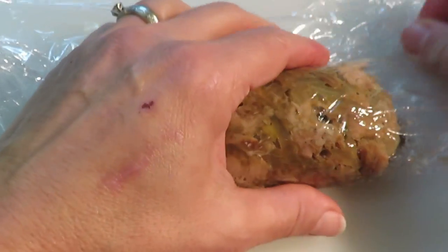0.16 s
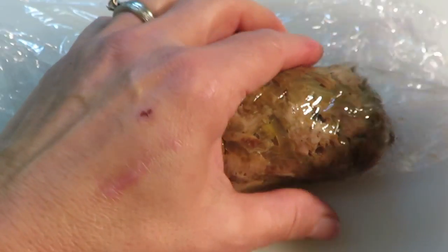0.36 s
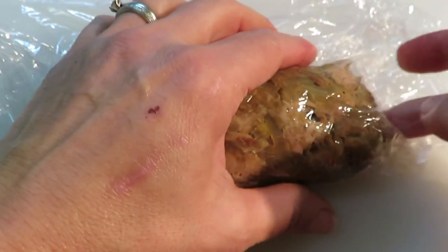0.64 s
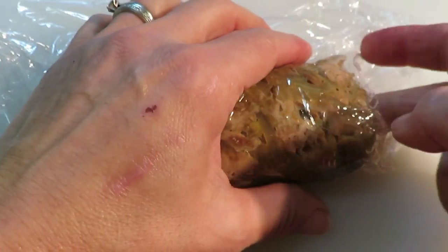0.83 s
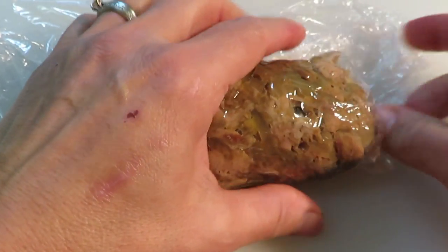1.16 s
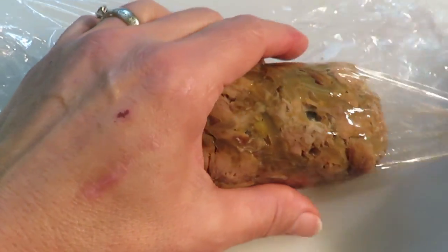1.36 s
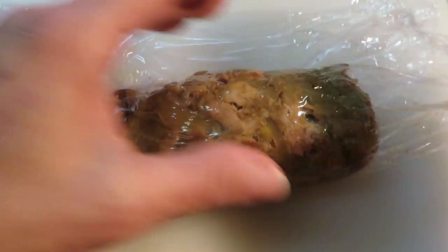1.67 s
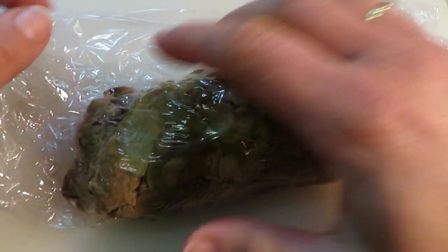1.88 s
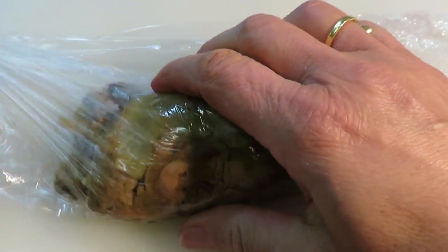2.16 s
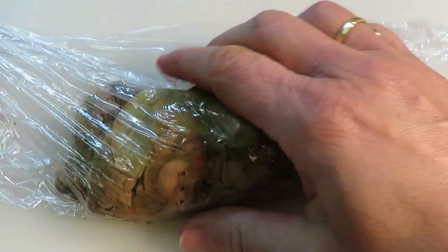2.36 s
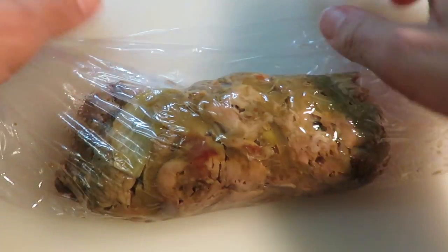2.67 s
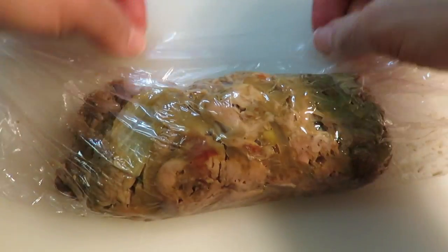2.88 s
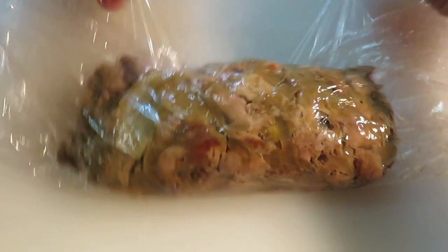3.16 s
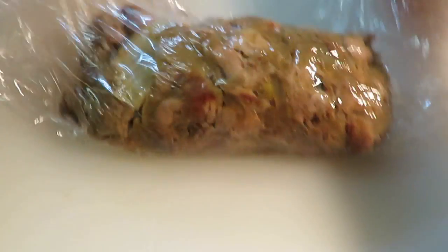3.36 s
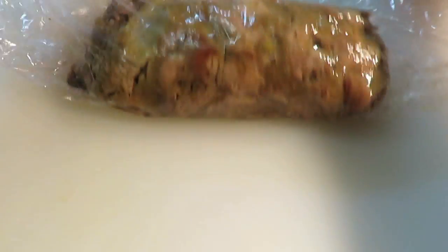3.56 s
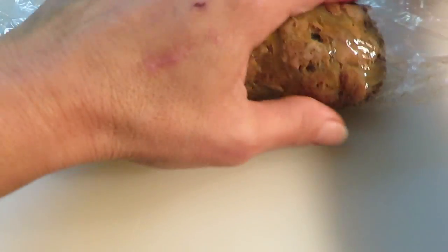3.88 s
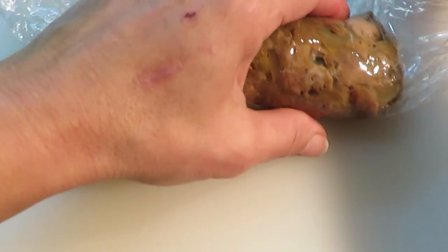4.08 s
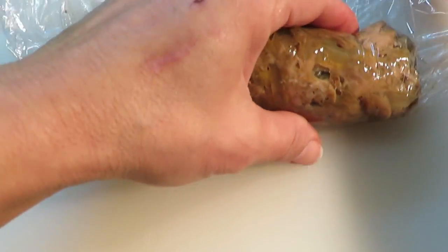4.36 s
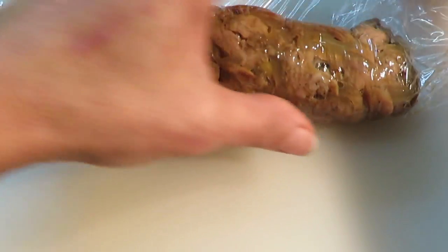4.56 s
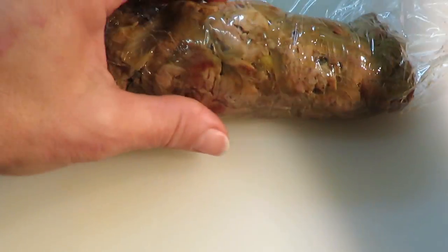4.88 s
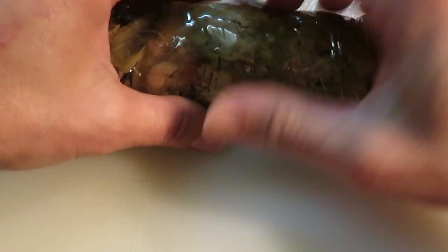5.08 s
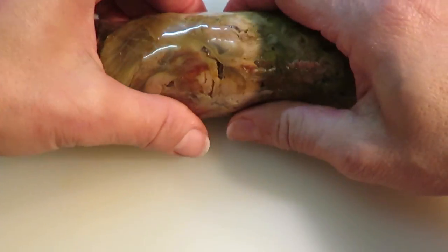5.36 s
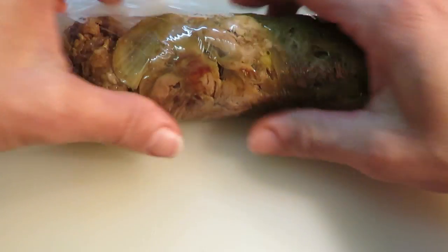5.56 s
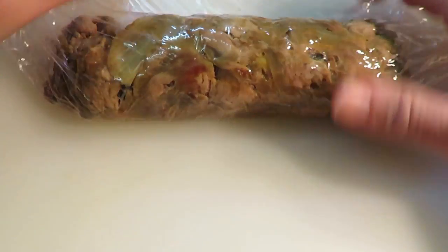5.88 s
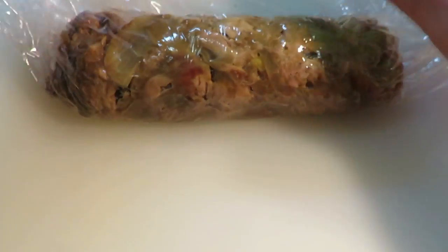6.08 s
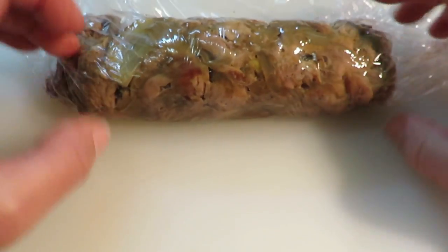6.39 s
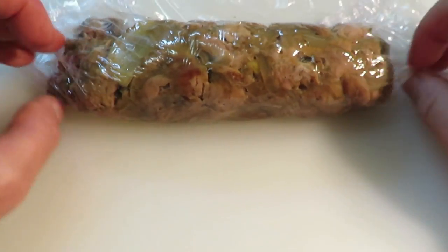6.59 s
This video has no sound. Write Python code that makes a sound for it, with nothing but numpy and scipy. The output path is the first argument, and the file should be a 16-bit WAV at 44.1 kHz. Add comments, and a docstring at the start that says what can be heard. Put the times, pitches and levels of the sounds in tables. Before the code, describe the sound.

Very close to the microphone, hands pull and twist thin plastic film around a firm roll of food. Bright crackling comes in short bursts with soft thuds on the board, then sharp snaps, densest just after two seconds. The board scrapes briefly, a hard thump follows, then quieter crinkling continues, ending with short scrapes. Small quiet kitchen, faint room noise.

```python
"""Hands roll and pull cling film around food on a plastic board in a quiet kitchen, heard close by. Throughout,
room noise lies under film crackle (swarms of ringing buckles) and the rumble of the board (noise-driven modes).
Early soft thuds (struck modes) come with two single snaps (large buckles) near 0.2 s; more snaps follow from
1.2 s, densest and loudest near 2.2 s. At 2.7 s the board scrapes the counter (stick-slip); a hard thud follows
at 3.3 s, then mostly quieter pulls from 4 s, and short scrapes again after 6.4 s."""
import sys
import numpy as np
from scipy import signal
from scipy.fft import rfft, irfft, next_fast_len
from scipy.io import wavfile
from scipy.ndimage import uniform_filter1d

SR = 44100
rng = np.random.default_rng(int(sys.argv[2]) if len(sys.argv) > 2 else 0)


def store_pcm(level_fs):
    """Save levels as 16-bit WAV."""
    pcm = np.round(np.clip(level_fs, -1, 1) * 32767).astype(np.int16)
    wavfile.write(sys.argv[1], SR, np.atleast_2d(pcm).T)


N = 296793
SPAN = next_fast_len(N)  # samples of a long transform


def amp(db):
    """Decibel definition: amplitude ratio of a level."""
    return 10 ** (np.asarray(db) / 20)


def evened(x):
    """Normalization to unit root-mean-square value."""
    return x / np.sqrt(np.mean(x ** 2) + 1e-20)


def smooth_noise(length):
    """Low-pass filtering by a moving average: slow noise of unit RMS."""
    return evened(uniform_filter1d(rng.standard_normal(N), length))


def read(points, hz):
    """Linear interpolation of a spectrum on a logarithmic frequency axis."""
    f, value = np.transpose(points)
    return np.interp(np.log(hz + 1), np.log(f + 1), value)


def kicks(s, size):
    """Impulse excitation: one sample of the given size at each time."""
    train = np.zeros(N)
    places = np.round(np.asarray(s) * SR).astype(int).clip(0, N - 1)
    np.add.at(train, places, size)
    return train


def ring(modes, damping=1):
    """Modal superposition: damped sines, neighbours in opposite phase; damping scales the bandwidths."""
    t = np.arange(8192) / SR
    total = 0
    for k, (hz, width_hz, db) in enumerate(modes):
        decay = np.exp(-np.pi * damping * width_hz * t)
        total = total + (-1) ** k * amp(db) * decay * np.sin(2 * np.pi * hz * t)
    return total


def rubbed(push, modes):
    """Forced vibration: a continuous push drives the modes, whose response has unit energy."""
    response = ring(modes)
    return signal.oaconvolve(push, response / np.linalg.norm(response))[:N]


def struck(s, db, modes, damping, soft):
    """Impact excitation: contact lasts soft samples, and each blow's ring peaks at db."""
    response = np.convolve(ring(modes, damping), np.hanning(round(soft) + 2))
    return signal.oaconvolve(kicks(s, amp(db)), response / abs(response).max())[:N]


def moves(rows, shape, rest_db=-120, rest_extra_db=0):
    """Power summation of overlapping movements: their level in dB and power-weighted extra column."""
    rise, fall, settle_db, settle_fall = shape
    s, length, db, growth_db, extra_db = np.transpose(rows)[:, :, None]
    t = np.arange(0, N + 64, 64) / SR
    after = np.maximum(t - s - length, 0)
    progress = np.clip((t - s) / np.maximum(length, .005), 0, 1)
    held_db = db - growth_db * (1 - progress) + rise * np.minimum(t - s, 0)
    stopping = amp(-2 * fall * after)
    settling = amp(2 * (settle_db - settle_fall * after))
    power = amp(2 * held_db) * (stopping + settling)
    rest = amp(2 * rest_db)
    total = power.sum(0) + rest
    extra = ((power * extra_db).sum(0) + rest * rest_extra_db) / total
    return [np.interp(np.arange(N) / SR, t, course) for course in (10 * np.log10(total), extra)]


# spectrum of the room noise, up to an overall gain: f/Hz, density level/dB per Hz
ROOM_SPECTRUM = [(12, -53), (20, -39), (124, -8), (218, -5.5), (361, -3.5), (492, -9.5), (690, -8.5),
                 (1280, -15), (1430, -12), (8890, -26.5), (16500, -50)]
ROOM_DB = -52.5  # RMS level over both ports
# likeness of the noise at the two ports: f/Hz, coherence/1
LIKENESS = [(60, 0.58), (300, 0), (1500, 0), (6000, 0), (15000, 0)]


def room_tone():
    """Stationary Gaussian noise: steady low room noise over microphone hiss, partly coherent at the ports."""
    hz = np.fft.rfftfreq(SPAN, 1 / SR)
    a, b = rfft(rng.standard_normal((2, SPAN)))
    same = np.clip(read(LIKENESS, hz), 0, 1)
    right = same * a + np.sqrt(1 - same ** 2) * b
    spectra = np.array([a, right]) * amp(read(ROOM_SPECTRUM, hz))
    return amp(ROOM_DB) * evened(irfft(spectra, SPAN)[:, :N])


def kitchen(x, t60, gap, low_hz):
    """Diffuse reverberation: a random tail after gap s, different at each port, thin below low_hz."""
    t = np.arange(round(t60 * SR)) / SR
    tail = rng.standard_normal((2, len(t))) * amp(-60 * t / t60) * (t > gap)
    tail = signal.lfilter(*signal.butter(2, low_hz, "high", fs=SR), tail)
    return signal.oaconvolve(x, tail / np.linalg.norm(tail[0]), axes=1)[:, :N]


def hands(x, count=3):
    """Time-varying scattering: as hands and food move, one close scatter pattern fades into the next."""
    turn = np.cumsum(9 + 4 * smooth_noise(4000)) / SR  # half turns
    fades = [np.sqrt(2 / count) * np.cos(np.pi * (turn + k / count)) for k in range(count)]
    return sum(kitchen(x * fade, .03, .0003, 1300) for fade in fades)


# modes of counter, board, rim and upper rim: f/Hz, bandwidth/Hz at unit damping, relative level/dB
COUNTER_MODES = [(62, 26.5, 2.5), (123.5, 67, 1), (199, 51, -5)]
BOARD_MODES = [(266.4, 71, 1), (351, 43, 2), (405.5, 83, 4.5)]
RIM_MODES = [(690, 40, -50), (705, 660, 5), (930, 205, 17), (1240, 190, 4)]
UPPER_RIM_MODES = [(1375, 68, -5), (1766, 133, -2.5), (2170, 140, -8), (3100, 1400, 3.5)]
# blows on the board: t/s, peak level/dB of counter, of board, of rim
BLOWS = [(.2, -38, -52, -33), (0.546, -44, -40, -38), (0.624, -36.5, -59, -33.5), (1.102, -42, -48, -31),
         (1.924, -36, -30.5, -43), (1.953, -41, -33, -44), (1.975, -38, -28, -40),
         (2.222, -48, -28.5, -28.5), (2.732, -33, -37, -47), (3.218, -33, -40, -55),
         (3.276, -17.5, -19.5, -15), (3.304, -48, -26.5, -24.5), (3.527, -30, -30.5, -25),
         (4.312, -41, -31, -33.5), (4.703, -58, -29.5, -30), (5.562, -41, -32, -59),
         (6.347, -44, -38.5, -35)]
# food and hands press on the board: start t/s, length/s, end level/dB, growth/dB, extra level/dB of
# the counter's deep modes
PRESS_MOVES = [(0, .04, -61, -22, -1), (1.36, .063, -41, 6.5, -3), (1.585, 0.057, -58.5, -5, 10.5),
               (1.919, 0.22, -45, -2, 2.5), (2.743, 0.13, -57.5, -6.5, 12.5),
               (2.978, 0.088, -49.5, -1, 2.5), (3.24, 0.14, -47.5, -7, -2), (3.453, 0.26, -47, -7, -3.5),
               (3.94, 0.15, -50.5, 3, -3), (4.3, 0.03, -54, -1, 2), (5.557, 0.46, -47, -1.5, -7),
               (6.053, 0.085, -56.5, -6, -2.5), (6.52, 0.19, -47.5, 2, -4)]
# envelope of a press: rise/(dB/s), fall/(dB/s), settling level/dB, settling fall/(dB/s)
PRESS_ENVELOPE = (296, 272, -29, 100.)
RESTING_DB, RESTING_DEEP_DB = -59.5, 2.5  # level between presses, and its extra for the deep modes


def board():
    """Forced and free vibration: lumpy rolling pressure and blows ring counter, board and rim."""
    lumpy = amp(1.8 * smooth_noise(700))
    shake, deep, middle, high = evened(rng.standard_normal((4, N)) * lumpy)
    level_db, deep_db = moves(PRESS_MOVES, PRESS_ENVELOPE, RESTING_DB, RESTING_DEEP_DB)
    roll = rubbed(deep * amp(level_db + deep_db), COUNTER_MODES[1:])
    roll = roll + rubbed(middle * amp(level_db), BOARD_MODES)
    roll = roll + rubbed(high * amp(level_db - 9), RIM_MODES)
    # the lowest mode never quite rests
    roll = roll + rubbed(shake * amp(0.34 * level_db - 38.0), COUNTER_MODES[:1])
    s, counter_db, board_db, rim_db = np.transpose(BLOWS)
    blows = struck(s, counter_db, COUNTER_MODES, 0.51, 40)
    blows = blows + struck(s, board_db, BOARD_MODES, 1.37, 32)
    return roll + blows + struck(s, rim_db, RIM_MODES + UPPER_RIM_MODES, 1.3, 13)


# board and food slide: start t/s, length/s, end level/dB, growth/dB, extra level/dB of the upper rim modes
SLIDE_MOVES = [(2.73, 0.14, -36, 1.5, -8.5), (3.49, .2, -50.5, -7.5, 2), (6.485, 0.036, -35, 13, -17),
               (6.53, 0.049, -26, 1.5, -12), (6.642, 0.069, -39, -11.5, -32)]
# envelope of a slide: rise/(dB/s), fall/(dB/s), settling level/dB, settling fall/(dB/s)
SLIDE_ENVELOPE = (4000., 700., -4., 260.)
# the sliding board catches: t/s, peak level/dB
CATCHES = [(2.7295, -19), (2.7605, -21), (6.5155, -20), (6.639, -16)]


def slides():
    """Stick-slip friction: dense, uneven slips and single catches ring the rim of the board."""
    grip = amp(1.5 * smooth_noise(250))
    slipping = rng.random((2, N)) < 4000 / SR  # 4000 slips per second on average
    slips, upper_slips = evened(slipping * rng.standard_normal((2, N)) * grip)
    level_db, upper_db = moves(SLIDE_MOVES, SLIDE_ENVELOPE)
    scrape = rubbed(amp(level_db) * slips, RIM_MODES)
    upper_scrape = rubbed(amp(level_db + upper_db) * upper_slips, UPPER_RIM_MODES)
    jolts = struck(*np.transpose(CATCHES), RIM_MODES + UPPER_RIM_MODES, 1.0, 22)
    return scrape + upper_scrape + jolts


# the hands change ends: t/s at mid-change (first row: start), lag of the film at the left port/samples
HAND_ENDS = [(0, 0.92), (1.75, -0.93), (2.5, 0.24), (3.1, -0.75), (3.75, 1.2), (4.75, -0.5), (6.28, 1.06)]
REACH_S = 0.14  # duration of a change of ends


def hand_place(t):
    """Path difference: lag between the ports, moving linearly at each change of ends."""
    s, lag = np.transpose(HAND_ENDS)
    steps = zip(s[1:], np.diff(lag))
    return lag[0] + sum(step * np.clip((t - at) / REACH_S + .5, 0, 1) for at, step in steps)


def ports(x, lag):
    """Interaural-style differences: the nearer of two ports hears a sound louder and a little earlier."""
    size = next_fast_len(x.shape[-1] + 64)
    side = np.array([[-.5], [.5]]) * lag
    # 8 spare samples of delay keep the early port causal; they are cut off again
    turn = np.exp(2j * np.pi * np.fft.rfftfreq(size) * (side - 8))
    return irfft(rfft(x, size) * turn * amp(0.87 * side), size)[:, 8:x.shape[-1] + 8]


def buckle(hz, cycles, draw):
    """Snap-through instability: one fold flips over with a sharp edge, short ring and ragged decay."""
    t = np.arange(len(draw)) / SR
    tone = np.sin(2 * np.pi * hz * t + 1) * np.exp(-t * hz / cycles)
    shape = tone + 0.72 * draw * np.exp(-t / 0.00021)
    return shape / np.linalg.norm(shape)


# pulls and twists of the film: start t/s, length/s, end crackle level/dB, growth/dB, extra level/dB of
# large slack folds
FILM_PULLS = [(-0.005, 0.037, -31, -4, -0.5), (0.082, 0.18, -36, 4.5, -4), (0.296, 0.097, -57, -6, 3),
              (0.518, 0.094, -30, 20.5, -6), (0.781, 0.15, -44, -5, -10.5), (0.982, 0.12, -45.5, -3, 0.5),
              (1.208, 0.12, -33, 3.5, -2.5), (1.378, 0.042, -22.5, 2.5, 1.5), (1.571, 0.084, -49.5, -10, 3),
              (1.764, 0.012, -45.5, -4, -2.5), (1.833, 0.073, -55, -9.5, 8.5),
              (1.989, 0.12, -31.5, 12.5, -1.5), (2.123, 0.016, -27.5, -2, 6), (2.178, 0.049, -27, 3, 0.5),
              (2.28, 0.087, -46.2, 15, -8), (2.508, 0.056, -45.5, 4, -3), (2.777, 0.099, -31, 15.5, -11),
              (2.926, 0.072, -23.5, 14, -2.5), (3.089, 0.088, -53.5, -3.5, 12),
              (3.185, 0.11, -35, 17.5, 11), (3.384, 0.15, -33.5, 13.5, 7.5), (3.586, 0.052, -44.5, 13.4, 0),
              (3.824, 0.17, -39.5, 3, 1), (4.006, 0.38, -42, 1.5, 5), (4.488, 0.083, -37.5, 9, -2),
              (4.648, 0.058, -44.5, 3, -6), (4.776, 0.12, -45.5, -0.7, -0.5), (4.967, 0.3, -45, -2, -0.5),
              (5.307, 0.13, -44.0, 4.5, 2), (5.539, 0.21, -37.5, -2.5, -0.5),
              (5.778, 0.17, -37, -2.3, -0.5), (6.025, 0.058, -49.5, -4, 0.5), (6.318, 0.083, -55, -10, -4),
              (6.465, 0.23, -36, 5, -2.5)]
# a pull swells, stops short and the loosened film settles: rise/(dB/s), fall/(dB/s), settling level/dB,
# settling fall/(dB/s)
PULL_ENVELOPE = (366, 585, -12, 88)
STILL_FILM_DB = -73  # level between pulls
# spectral shaping of the crackle, up to an overall gain: f/Hz, density level/dB per Hz
CRACKLE_SPECTRUM = [(180, -21), (300, 0), (361, -5.5), (449, -6.5), (1250, -7), (2130, -1.5), (2700, -3),
                    (12800, -4), (15700, -5), (16500, -30)]


def crackle():
    """Clustered random impulses: swarms of tiny buckles in clumps; a few are large and sharp."""
    level_db, slack_db = moves(FILM_PULLS, PULL_ENVELOPE, STILL_FILM_DB)
    clumps = evened(uniform_filter1d(uniform_filter1d(rng.standard_normal(N), 500), 300))
    fires = rng.random(N) < 7000 / SR * amp(3.5 * clumps)  # about 7000 per second at middling density
    size = fires * rng.choice([-1., 1.], N) * amp(3.3 * np.minimum(rng.exponential(1, N), 7))

    pitch = np.geomspace(1200, 13000, num=8)  # Hz
    kind = rng.integers(0, len(pitch), N)
    size = size * amp(level_db + slack_db * (1 - kind / (len(pitch) - 1)))  # slack folds ring low
    drift = uniform_filter1d(rng.standard_normal((len(pitch), N // 256 + 1)), 12, axis=1)
    size = size * amp(2.3 * evened(drift)[kind, np.arange(N) // 256])  # fold sizes come and go

    spot = hand_place(np.arange(N) / SR) + 0.75 * rng.standard_normal(N)
    places = np.linspace(-1.5, 1.5, num=4)  # lags in samples
    nearest = abs(spot - places[:, None]).argmin(0)
    shapes = [buckle(hz, 2.0, rng.standard_normal(256)) for hz in pitch]
    out = 0
    for p, place in enumerate(places):
        here = sum(signal.oaconvolve(size * (kind == k) * (nearest == p), shape)[:N]
                   for k, shape in enumerate(shapes))
        out = out + ports(here, place)

    # flatten the buckles' joint spectrum, then impose that of the film
    hz = np.fft.rfftfreq(SPAN, 1 / SR)
    joint = np.sqrt(sum(abs(rfft(shape, SPAN)) ** 2 for shape in shapes))
    shaped = irfft(rfft(out, SPAN) * amp(read(CRACKLE_SPECTRUM, hz)) / joint, SPAN)[:, :N]
    return evened(shaped) * np.sqrt(np.mean(amp(2 * level_db)))


# single snaps: t/s, peak level/dB before the port difference, f/Hz
FILM_SNAPS = [(0.169, -21, 2920), (0.243, -19, 2980), (1.1834, -17, 2840), (1.2963, -13, 5900),
              (1.4006, -8, 6900), (1.425, -12, 4800), (1.4663, -1.5, 6800), (1.5752, -11.5, 5450),
              (2.12, -4, 4600), (2.1328, -17, 6700), (2.1422, -2, 7300), (2.1473, 3, 6800),
              (2.1784, 5.5, 4200), (2.183, -19, 6400), (2.2174, 2, 4450), (2.27, -14.5, 6700),
              (2.9681, -9.5, 4800), (2.9798, -2.5, 5930), (2.9955, -14, 6500), (3.2748, -9.5, 2230),
              (3.3032, -14, 6800), (3.376, -13.5, 7040), (3.445, -15.5, 5830), (3.526, -13.5, 3520),
              (3.9558, -12, 10700), (4.0153, -19.5, 4570), (4.2207, -16.5, 3620), (4.3126, -11, 2680),
              (4.7033, -4.5, 6540), (4.7213, -28, 7700), (5.505, -24, 8200), (5.6703, -28, 5200),
              (6.31, -23.5, 6100)]
BURST_RISE_MS, BURST_FALL_MS = 0.825, 1.65  # time constants of the small buckles around a snap


def snaps():
    """Sudden release of strain: a stuck patch lets go, one large buckle amid a burst of smaller ones."""
    out = np.zeros((2, N + 1024))
    draws = rng.standard_normal((len(FILM_SNAPS), 2, 1024))
    lead = 128  # samples before the large buckle
    since_ms = (np.arange(1024) - lead) / SR * 1000
    envelope = np.exp(np.where(since_ms < 0, since_ms / BURST_RISE_MS, -since_ms / BURST_FALL_MS))
    thin = signal.butter(2, 1500, "high", fs=SR)  # a small fold radiates no bass
    for (s, db, hz), (draw, spikes) in zip(FILM_SNAPS, draws):
        burst = amp(-18) * spikes * abs(draw[::-1]) * envelope
        burst[lead] += 1
        sound = np.convolve(burst, buckle(hz, 0.53, draw[:64]))[:1024]
        sound = signal.lfilter(*thin, sound)
        sound = ports(sound / abs(sound).max(), hand_place(s))
        start = round(s * SR) - lead
        out[:, start:start + 1024] += amp(db) * sound
    return out[:, :N]


def scene():
    """Linear superposition: direct sound, close scatter, kitchen reverberation and room noise."""
    near = crackle() + snaps() + board() + slides()
    scatter = amp(-11.5) * hands(near)
    reverberation = amp(-13.5) * kitchen(near, 0.26, 0.0022, 206)
    return near + scatter + reverberation + room_tone()


EDGE_HZ = 15500  # upper band limit


def record(dry):
    """Transducer nonlinearity: a small capsule loses deep bass and saturates softly; then a band limit."""
    thin = signal.lfilter(*signal.butter(2, 45, "high", fs=SR), dry)
    soft = .85 * np.tanh(thin / .85)
    band_limit = signal.firwin(511, EDGE_HZ, window=("kaiser", 9), fs=SR)
    return signal.oaconvolve(soft, band_limit[None], "same")


dry = scene()
out = record(dry)
store_pcm(out)
```